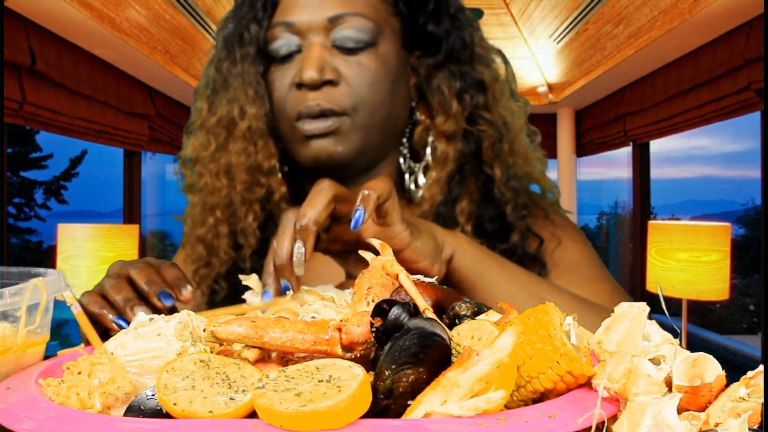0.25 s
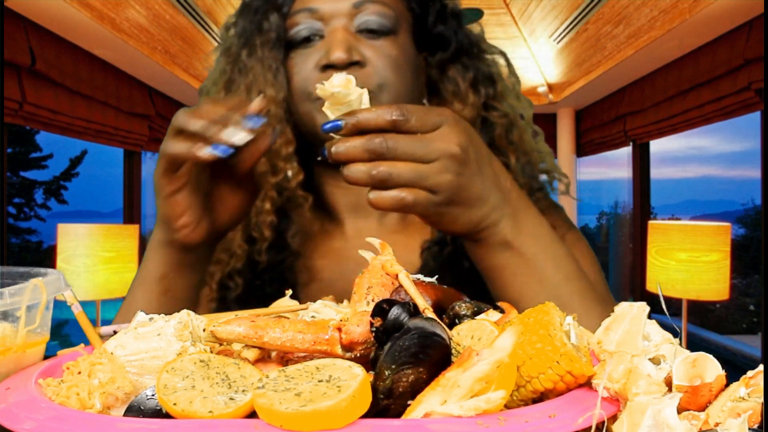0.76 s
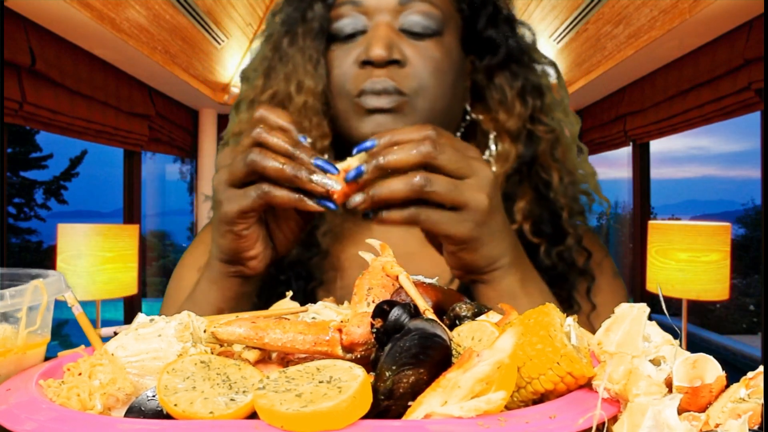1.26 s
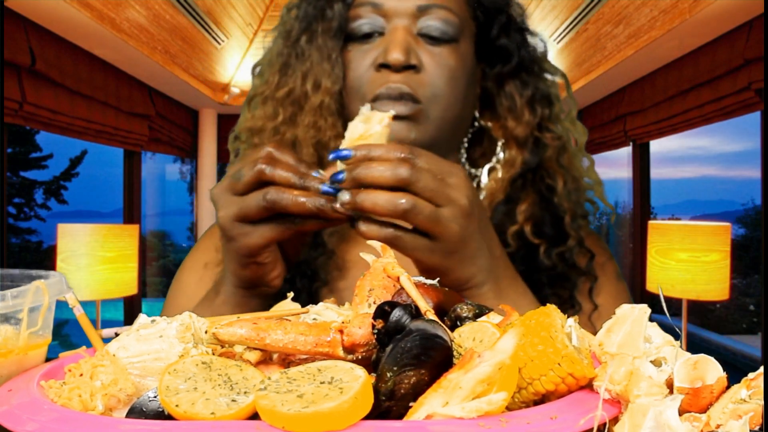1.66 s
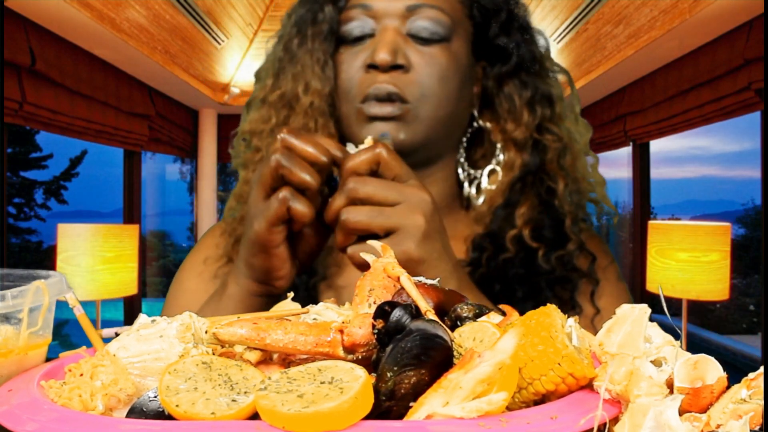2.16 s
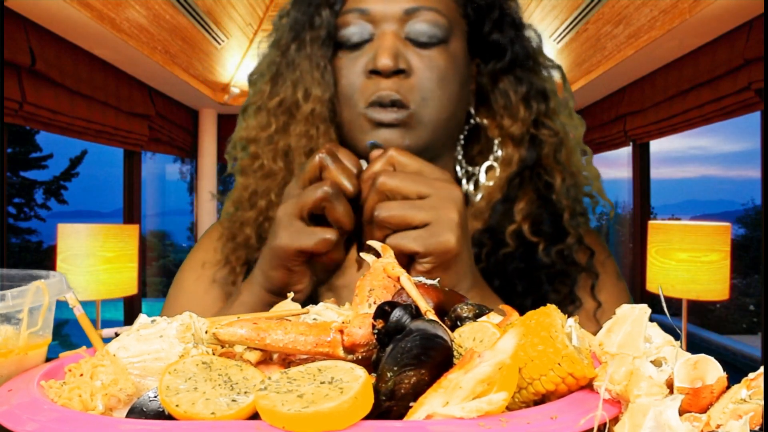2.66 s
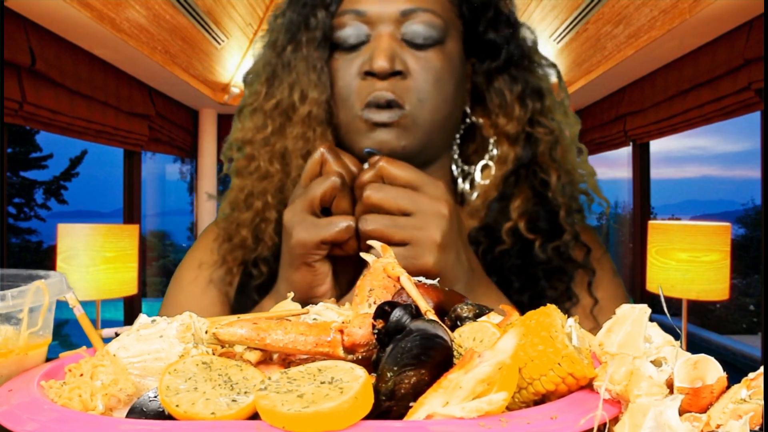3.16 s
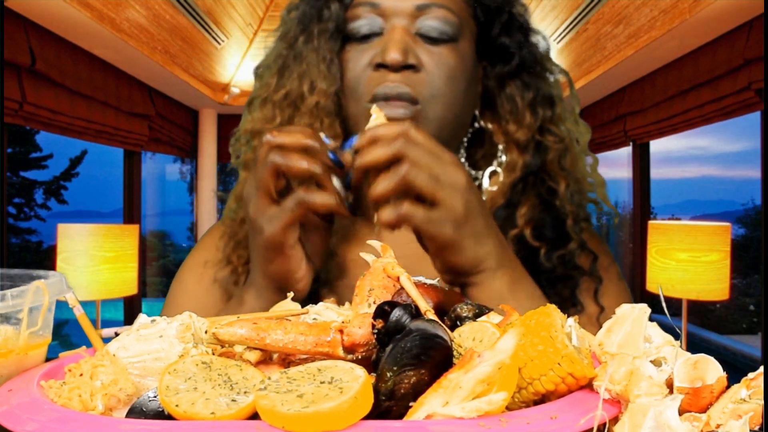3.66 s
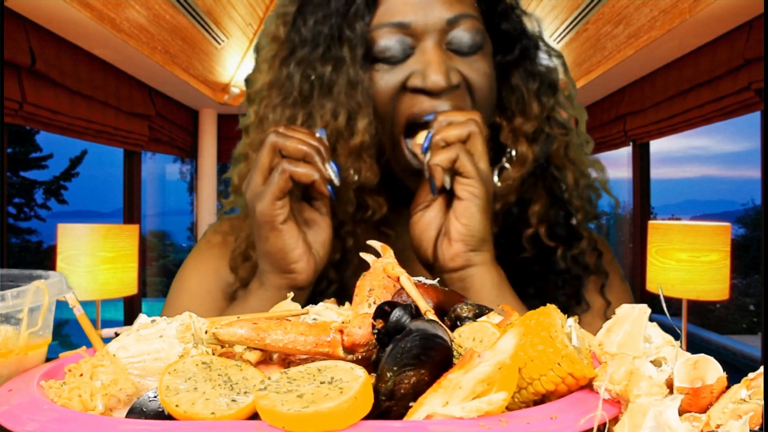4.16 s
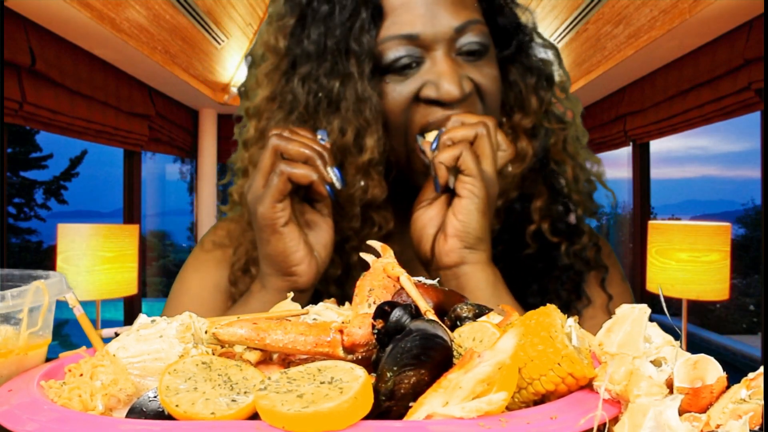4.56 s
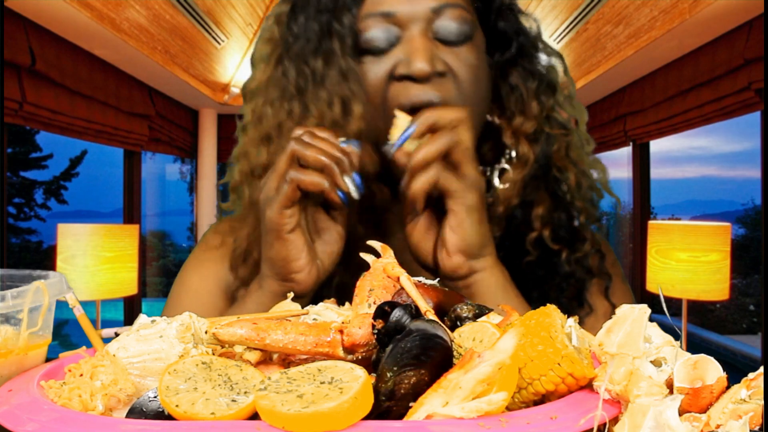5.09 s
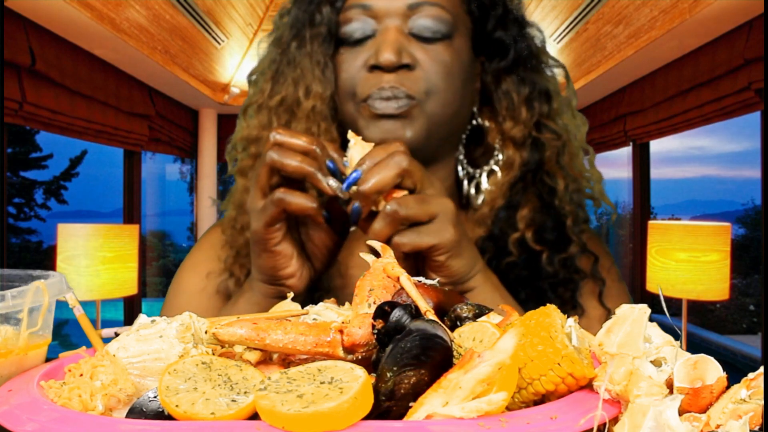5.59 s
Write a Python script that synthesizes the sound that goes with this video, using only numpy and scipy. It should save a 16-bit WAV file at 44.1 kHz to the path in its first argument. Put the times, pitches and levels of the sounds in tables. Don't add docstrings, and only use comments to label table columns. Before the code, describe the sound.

Close-up crab shell being picked and twisted by hand in a small hard room, sparse brittle ticks, then one very loud crunching crack.

```python
import sys
import numpy as np
from scipy import signal
from scipy.io import wavfile
from scipy.ndimage import uniform_filter1d

SR = 44100
rng = np.random.default_rng(int(sys.argv[2]) if len(sys.argv) > 2 else 0)


def put_to_file(sound):
    columns = np.atleast_2d(sound).T
    safe = np.clip(columns, -1, 1)
    whole_steps = np.round(safe * 32767)
    wavfile.write(sys.argv[1], SR, whole_steps.astype(np.int16))


def voltage_ratio(level):
    return 10 ** (np.asarray(level, float) / 20)


N = 257103


def evened(x):
    return x / np.sqrt(np.mean(x ** 2) + 1e-20)


def read(points, hz):
    point_hz, value = np.transpose(points)
    return np.interp(np.log(hz + 1), np.log(point_hz + 1), value)


def add(mix, start_s, sound):
    part = mix[max(round(start_s * SR), 0):][:len(sound)]
    part += sound[:len(part)]


def resonate(x, hz, width_hz):
    r = np.exp(-np.pi * np.clip(width_hz, 20, 12000) / SR)
    turn = 2 * np.pi * min(hz, 18000) / SR
    return signal.lfilter([1 - r, 0, r - 1], [1, -2 * r * np.cos(turn), r * r], x)


def fracture(chance, spread_s):
    later_share = 0.69
    clicks = np.zeros(1500)
    later = (chance[:8] * spread_s * SR).astype(int) + 5
    size = 2 * chance[8:] - chance[8:].max()
    np.add.at(clicks, later, size * (1 - chance[:8]) * later_share)
    clicks[0] = 1
    return clicks


def ring(hz, share, lower_db, chance):
    hit = fracture(chance, spread_s=0.004)
    width_hz = share * hz
    upper = resonate(hit, hz, width_hz)
    lower = resonate(hit, 0.76 * hz, width_hz)
    pair = upper - voltage_ratio(lower_db) * lower
    push = resonate(hit, 0.39 * hz, 0.2 * hz)
    return resonate(pair, 0.95 * hz, 2.8 * hz) + voltage_ratio(-30) * push


def tick(hz, share, wide_db, chance):
    hit = fracture(chance, spread_s=0.0015)
    own = resonate(resonate(hit, hz, share * hz), hz, 4.2 * share * hz)
    wide = resonate(resonate(hit, 8100, 9500), 4200, 6200)
    return evened(own) + voltage_ratio(wide_db) * evened(wide)


def place(events, make, share, second_db, lag_s=0.0, first_path=0):
    build_s = 0.0006
    out = np.zeros((4, N))
    chances = rng.random((len(events), 16))
    for k, ((start_s, peak_db, hz, room_db), chance) in enumerate(zip(events, chances)):
        sound = make(hz, share, second_db, chance)
        sound = voltage_ratio(peak_db) * sound / abs(sound).max()
        plain = evened(make(hz, share, second_db, 0 * chance))
        at_s = start_s + build_s + lag_s
        add(out[0], at_s, sound)
        add(out[1 + (k + first_path) % 3], at_s, voltage_ratio(room_db) * plain * np.std(sound))
    return out


def hiss(patchy_db=0.5):
    # frequency in Hz, density in dB per Hz.
    density = [(26, -25), (50, -18), (62, -4), (80, -29), (100, -9), (122, 0), (150, -7.5), (250, -8),
               (800, -12.5), (2400, -15.5), (9200, -25.5), (10200, -29.5), (15750, -30.5), (15950, -61)]
    frames, hz = N // 512 + 5, np.fft.rfftfreq(2048, 1 / SR)
    a, b, patches = rng.standard_normal((frames, 1025, 3)).T
    patches = uniform_filter1d(patches, size=20, axis=0)
    patches = evened(uniform_filter1d(patches, size=8, axis=1))
    z = (a + 1j * b) * voltage_ratio(read(density, hz)[:, None] + patchy_db * patches)
    noise = signal.istft(z, nperseg=2048, noverlap=1536)[1][:N]
    return voltage_ratio(-58.5) * evened(noise)


def crackle(per_s=900, uneven_db=4.0):
    # time in seconds, level in dB.
    strains = [
        [(0.0, -33.5), (0.14, -40.5), (0.224, -39.5), (0.516, -63), (0.6, -67)],
        [(0.95, -56), (1.138, -46.5), (1.286, -54), (1.438, -55), (1.646, -69)],
        [(1.894, -85), (2.186, -40), (2.328, -60), (2.8, -59)],
        [(3.3, -62), (3.376, -45), (3.508, -90), (3.74, -55.5), (3.9, -77)],
        [(3.97, -75), (4.02, -55), (4.156, -65), (4.65, -71)],
        [(5.15, -59), (5.476, -64), (5.83, -60)],
    ]
    # frequency in Hz, width in Hz, level in dB.
    modes = [(745, 790, -8.5), (2080, 190, 4), (2600, 290, 1), (3500, 330, 1), (5070, 3000, -8),
             (8400, 8400, -17)]
    t, level = np.arange(N) / SR, np.zeros(N)
    for rows in strains:
        s, db = np.transpose(rows)
        level += voltage_ratio(np.interp(t, s, db, -150, -150))
    size = voltage_ratio(uneven_db * np.minimum(rng.exponential(1, N), 4))
    slips = size * (rng.random(N) < per_s / SR)
    slips *= rng.choice([-1.0, 1.0], N)
    body = np.zeros(N)
    for k, (hz, width_hz, db) in enumerate(modes):
        body += (-1) ** k * voltage_ratio(db) * resonate(slips, hz, width_hz)
    return voltage_ratio(-6.5) * level * evened(body)


def held_notes():
    # start in seconds, peak in dB, pitch in Hz, room share in dB.
    notes_held = [(0.00298, -31, 1540, -7), (0.197, -33, 527, -2), (0.245, -35, 544, 2.5),
                  (4.765, -15, 1380, -2), (3.764, -38.5, 850, -9), (3.764, -44, 711, -9),
                  (3.785, -47, 580, -8), (3.803, -46, 900, -8), (0.176, -34, 430, -4),
                  (0.21, -34.5, 432, -3), (0.268, -30, 545, 0), (0.004, -31, 1150, 0),
                  (0.255, -27.5, 1063, -0.5), (0.055, -29, 1090, -4)]
    return place(notes_held, ring, share=0.064, second_db=-21, lag_s=0.001183)


def knocks():
    # start in seconds, peak in dB, pitch in Hz, room share in dB.
    knock_events = [(0.003, -23, 1460, -6), (0.118, -32, 1480, 0), (0.13, -37, 1110, 4.5),
                    (0.173, -23.5, 1450, 3), (0.243, -18.5, 1042, -3), (0.261, -21, 1220, -2.5),
                    (0.313, -37, 1670, 0), (1.742, -49, 1140, 2), (2.167, -46, 1500, -3),
                    (3.7585, -38.5, 810, -11), (4.673, -26.5, 1600, -0.5)]
    return place(knock_events, ring, share=0.25, second_db=-8.5, lag_s=0.0012)


def thumps():
    # start in seconds, peak in dB, pitch in Hz, room share in dB.
    thump_events = [(0.003, -45, 540, 1), (0.032, -28.5, 575, 0), (0.099, -39, 507, -1),
                    (0.195, -26.5, 490, -6.5), (0.243, -28.5, 525, -2.5), (0.367, -39.5, 540, 4),
                    (3.757, -49, 480, -2), (5.447, -48.5, 408, -9)]
    return place(thump_events, ring, share=0.6, second_db=0.01, lag_s=0.00198)


def pings():
    # start in seconds, peak in dB, pitch in Hz, room share in dB.
    ping_events = [(0.0034, -35, 2430, -14), (0.177, -27, 2660, 1.5), (1.682, -36, 2530, 0),
                   (1.7394, -40, 2500, 6), (1.7689, -22.5, 2534, 0), (2.0188, -46, 2590, 0),
                   (2.146, -49, 2560, 6), (2.155, -45, 2100, 3), (2.1925, -30, 2840, -2),
                   (2.603, -45.5, 3500, 3.5), (2.606, -48, 3700, 5), (2.566, -43, 2300, 6),
                   (2.6, -43, 1950, 1), (2.7482, -47, 2420, -6), (2.8913, -55.5, 1840, 4),
                   (3.7554, -47, 2100, -1), (4.363, -39.5, 1480, -1), (4.7756, -10.5, 3060, -1.5),
                   (4.7815, -10.5, 2750, 4), (5.3354, -40.5, 2180, 0), (5.7645, -49, 2500, 2),
                   (5.7645, -50, 3670, 3), (4.7695, -11.5, 3360, 3), (0.5, -49, 2420, 6)]
    return place(ping_events, ring, share=0.066, second_db=-22)


def specks():
    # start in seconds, peak in dB, pitch in Hz, room share in dB.
    speck_events = [(0.0037, -24.5, 8500, 2.5), (0.89, -51, 5820, -7), (1.7994, -44, 5500, -4),
                    (4, -45, 5210, -11), (4.7684, -13.5, 5700, 1), (4.878, -20, 7900, -6),
                    (4.78, -14, 5100, -4), (4.635, -45, 5000, 1.5), (3.487, -44, 5200, -6),
                    (3.492, -44, 4100, -6), (3.772, -45, 6000, 0), (5.8274, -52, 5660, -7),
                    (1.855, -29.5, 5700, -3), (4.6746, -15, 4900, -4), (2.166, -38, 4600, 7),
                    (1.681, -32, 7400, -5)]
    return place(speck_events, tick, share=0.096, second_db=-4)


def ticks():
    # start in seconds, peak in dB, pitch in Hz, room share in dB.
    tick_events = [(0.0348, -11.5, 4100, -7.5), (0.188, -26, 4050, -11), (0.3093, -27, 4740, -9),
                   (0.944, -41.5, 4030, 2), (0.9652, -40, 5260, -1), (1.1412, -39, 4300, -6),
                   (1.2025, -42, 4990, -2), (1.5918, -42, 4300, -7), (1.6566, -33, 4670, -10),
                   (1.7697, -14.5, 4300, -1.5), (1.9917, -48, 7220, 12.5), (2.0194, -34, 7560, -6),
                   (2.1643, -27.5, 4270, 1), (2.4818, -48, 4770, 4), (2.56, -39, 6000, 6),
                   (2.5676, -39, 6700, 9), (3.3786, -39, 4080, -18), (3.4855, -40, 4880, -4),
                   (3.4974, -40, 4000, 3), (3.7554, -34.5, 4140, -0.5), (4.0142, -46, 5200, 8),
                   (4.2046, -47, 4100, 5.5), (4.6742, -2.5, 4200, -5), (5.3336, -45.5, 5020, 0),
                   (5.4045, -41, 7000, 7), (5.5079, -36, 5000, -2), (5.5478, -44, 5800, -24),
                   (0.133, -24, 4480, -13), (2.1925, -41, 4500, -8)]
    return place(tick_events, tick, share=0.59, second_db=-0.019)


def splits():
    # start in seconds, peak in dB, pitch in Hz, room share in dB.
    split_events = [(0.0348, -19, 1980, -6), (0.1874, -21.5, 2180, 1), (0.3112, -22.5, 2000, 2),
                    (1.854, -30.5, 2510, 2), (2.0356, -42.5, 2600, 7.5), (2.2446, -44, 2020, 3),
                    (2.5693, -40, 2170, 8.5), (2.6, -43.5, 1800, 4.5), (2.598, -33.5, 2240, 1.5),
                    (3.5244, -27, 2540, 3), (4.7645, -9.5, 2540, 8.5), (4.8333, -14.5, 2730, -3),
                    (4.8657, -24, 2540, 8.5), (5.01, -42, 2600, 4), (5.659, -35, 3130, -3.5)]
    return place(split_events, ring, share=0.39, second_db=-3)


def taps():
    # start in seconds, peak in dB, pitch in Hz, room share in dB.
    tap_events = [(0.2457, -20, 4700, -5.5), (0.5207, -42, 4830, -2), (1.0512, -36, 4900, -3.5),
                  (1.3293, -37.5, 4700, -13), (1.6795, -30, 6300, -6), (1.708, -35, 4250, -4),
                  (1.853, -24.5, 5200, -6), (2.0379, -34.5, 4300, -7), (4.1217, -37, 8600, -5),
                  (4.3632, -33.5, 4800, -2.5), (4.6199, -30, 4300, -6), (5.659, -22, 5660, -8),
                  (4.7754, -5.5, 3060, -16), (4.7812, -8, 3040, -16), (2.164, -29, 2900, -10),
                  (1.1407, -32, 3200, -12), (0.2441, -15, 2100, -12), (0.3119, -21, 2800, -17),
                  (0.0349, -12, 1300, -16), (3.378, -31, 2800, -6)]
    return place(tap_events, tick, share=0.34, second_db=-8.5)


def blows():
    # start in seconds, peak in dB, pitch in Hz, room share in dB.
    blow_events = [
        (0.035, -14, 1205, 1),
        (0.175, -29.5, 484, 2.6),
    ]
    return place(blow_events, ring, share=0.84, second_db=-13, lag_s=0.001483)


def pins():
    # start in seconds, peak in dB, pitch in Hz, room share in dB.
    pin_events = [(1.2635, -42, 11500, -6), (3.6646, -32.5, 10800, -8), (3.8721, -49, 11200, -6),
                  (4.0342, -45, 11900, -4), (4.6743, -28, 10900, -12.5), (4.7645, -6, 10500, -13),
                  (4.8643, -14, 10900, -2), (0.099, -36, 13000, -2), (0.354, -47, 13000, -6),
                  (0.479, -46, 12000, -7), (5.416, -48, 14300, 0), (5.661, -45, 14400, -2)]
    return place(pin_events, tick, share=0.2, second_db=-22, first_path=1)


def snaps():
    # start in seconds, peak in dB, pitch in Hz, room share in dB.
    snap_events = [(0.1486, -25, 3920, 2), (0.474, -38.5, 5270, 1), (1.4228, -35, 8900, -4),
                   (1.727, -35.5, 4340, 7), (1.745, -36, 4600, 2.5), (3.3417, -41.5, 4100, 3),
                   (3.5236, -23, 4700, -4), (3.8454, -50, 6800, 4), (4.7653, 5, 4900, -6),
                   (4.8653, -1.5, 7900, -6.5), (5.1845, -30, 5630, -3.5), (5.7638, -45, 8000, 9),
                   (4.8478, -12, 9000, -7), (5.25, -43.5, 9000, 7), (5.373, -48, 7000, -4),
                   (5.787, -48, 8000, -4)]
    return place(snap_events, tick, share=0.14, second_db=15)


def shell_rings():
    # start in seconds, peak in dB, pitch in Hz, room share in dB.
    ring_events = [(0.1494, -23.5, 2520, 5.5), (0.2443, -18.5, 2100, 3.5), (0.4776, -43, 2390, 9.5),
                   (0.9443, -45, 2590, -4), (0.9667, -40.5, 2470, -6), (0.9784, -43, 2690, -6),
                   (1.0356, -35, 2390, 3.5), (1.2237, -36, 2260, -14), (1.329, -39.5, 2790, 1),
                   (1.4594, -44, 2520, -2), (1.5933, -45, 2500, 2), (1.6561, -49, 3500, 6),
                   (1.7445, -29, 2500, 0), (2.164, -34, 2150, 5.5), (2.4845, -55, 2460, 8),
                   (2.552, -48.5, 2360, 12), (3.335, -45, 2400, 0), (3.3427, -41.5, 2330, 6),
                   (3.3824, -23.5, 2370, -1.5), (3.486, -44, 2150, 5), (3.4985, -34, 2700, 1),
                   (3.5028, -34, 2550, 3), (4.363, -37.5, 2190, -2), (4.6194, -39.5, 3240, -3),
                   (4.675, -18.5, 2790, 1.5), (5.1846, -56, 2180, 0), (5.2175, -48, 2530, 9.5),
                   (5.4048, -49.5, 3490, 1), (5.5079, -40, 2780, -5), (5.826, -44, 2800, 6)]
    return place(ring_events, ring, share=0.13, second_db=-6.5)


def slips():
    # start in seconds, peak in dB, pitch in Hz, room share in dB.
    slip_events = [(1.0507, -51.5, 2090, 8.5), (1.1417, -38, 3500, -4), (1.1964, -35, 2970, 3.5),
                   (1.2032, -36.5, 2780, 5.5), (1.7986, -39, 2380, -5), (3.378, -30.5, 2640, 6.5),
                   (4.305, -58, 3150, 2), (4.351, -46, 3050, 9)]
    return place(slip_events, ring, share=0.2, second_db=1.6)


def chips():
    # start in seconds, peak in dB, pitch in Hz, room share in dB.
    chip_events = [(1.434, -46, 9350, -3), (4.31, -50, 3200, 4), (5.4125, -39, 9250, -4),
                   (5.4135, -40, 8700, -4), (5.66, -38, 9400, -2), (5.661, -38, 8750, -2)]
    return place(chip_events, ring, share=0.035, second_db=-25)


def room(feeds):
    # frequency in Hz, 60 dB decay time in seconds.
    decay = [(300, 0.34), (1000, 0.56), (2800, 0.4), (7000, 0.34), (14000, 0.22)]
    # frequency in Hz, gain in dB.
    colour = [(300, 0.5), (1000, 3.5), (2500, -1.5), (5000, 2), (9000, 0.5), (15000, 1.5)]
    # delay in seconds, level in dB.
    echoes = [(.0032, -2), (.0058, -17), (0.0092, -7.5), (0.0196, -9.5), (0.026, -18), (.031, -28)]
    impulses, age_s = np.zeros((3, SR)), np.arange(SR) / SR
    at = np.arange(60, SR - 10, 10) + rng.integers(0, 10, (3, (SR - 61) // 10))
    np.put_along_axis(impulses, at, rng.standard_normal(at.shape), axis=1)
    impulses *= (1 - np.exp(-age_s / 0.00065)) * (1 + 0.34 * np.exp(-age_s / 0.049))
    for delay_s, db in echoes:
        impulses[:, round(delay_s * SR)] += 3.6 * voltage_ratio(db)
    hz, t, z = signal.stft(impulses, SR, nperseg=128)
    z *= voltage_ratio(read(colour, hz)[:, None] - 60 * t / read(decay, hz)[:, None])
    tails = signal.istft(z, SR, nperseg=128)[1]
    tails = tails / np.linalg.norm(tails[0])
    return signal.fftconvolve(feeds, tails, axes=1)[:, :N].sum(axis=0)


def microphone(x):
    # frequency in Hz, gain in dB.
    response = [(150, 1.5), (1300, -3), (1800, -3), (2120, -1.5), (2330, -1.5), (2600, -0.5), (3000, -1),
                (4000, 0.5), (4900, 0), (6500, -2), (9200, -1), (10200, -4), (16000, 0)]
    hz = abs(np.fft.fftfreq(4096, 1 / SR))
    log_gain = np.log(voltage_ratio(read(response, hz)))
    impulse = np.fft.ifft(np.exp(np.conj(signal.hilbert(log_gain)))).real[:1024]
    return signal.oaconvolve(x, impulse)[:N]


def scene():
    parts = held_notes() + knocks() + thumps() + pings() + specks()
    parts += ticks() + splits() + taps() + blows() + pins()
    parts += snaps() + shell_rings() + slips() + chips()
    fine = crackle()
    parts[1] += voltage_ratio(-6.5) * fine
    low_pass = signal.firwin(255, 15850, fs=SR)
    wet = signal.oaconvolve(room(parts[1:]), low_pass, "same")
    return (microphone(parts[0] + fine + voltage_ratio(4.0) * wet) + hiss())[None]


def top_cut(x):
    return signal.sosfilt(signal.butter(12, 16670, fs=SR, output="sos"), x)


def record(dry):
    started = np.arange(N) > 0.0035 * SR
    over = dry - np.clip(dry, -0.97, 0.97)
    clipped = dry - signal.lfilter(*signal.butter(2, 500, "high", fs=SR), over)
    edge = signal.firwin(255, 16500, window=("kaiser", 8), fs=SR)
    limited = signal.oaconvolve(clipped * started, edge[None], "same")
    return top_cut(np.clip(limited, -1, 1))


dry = scene()
out = record(dry)
put_to_file(out)
```